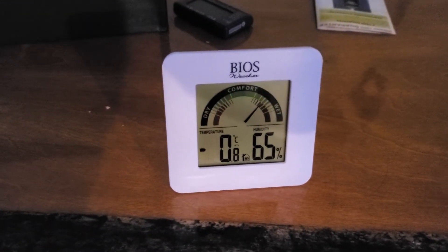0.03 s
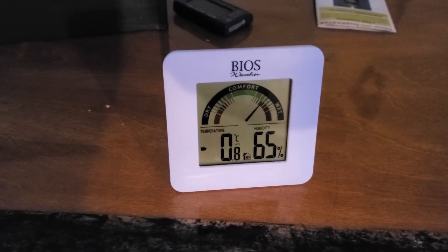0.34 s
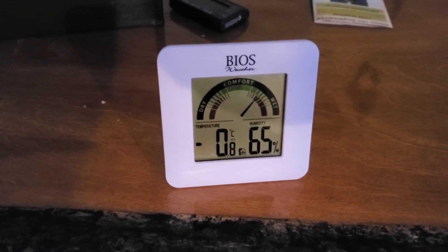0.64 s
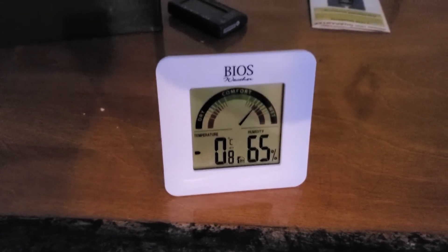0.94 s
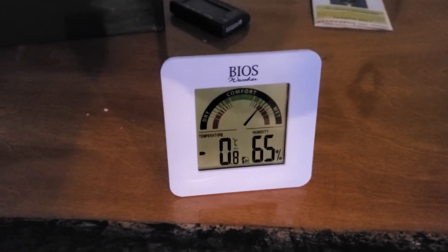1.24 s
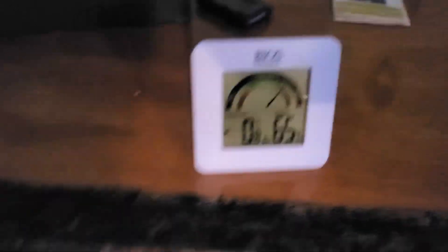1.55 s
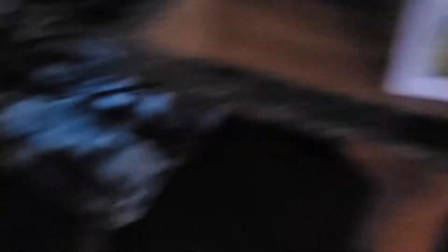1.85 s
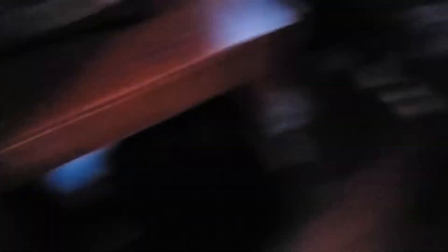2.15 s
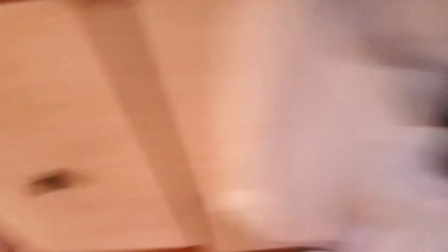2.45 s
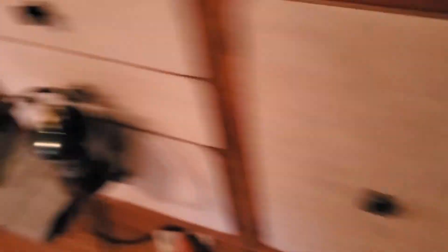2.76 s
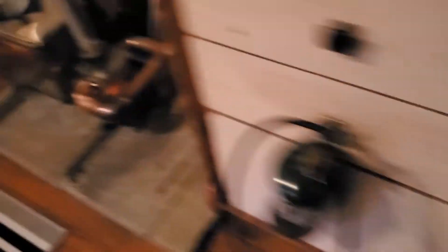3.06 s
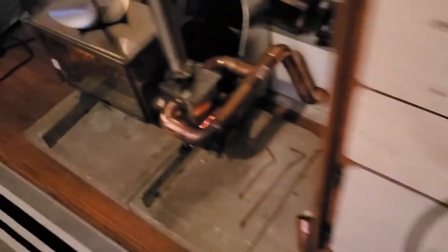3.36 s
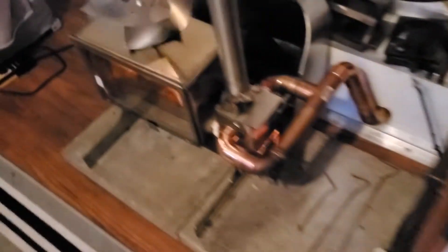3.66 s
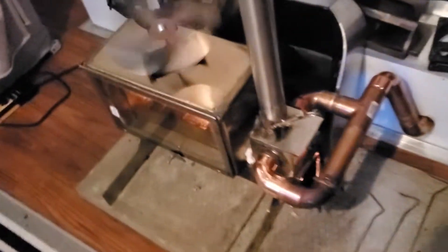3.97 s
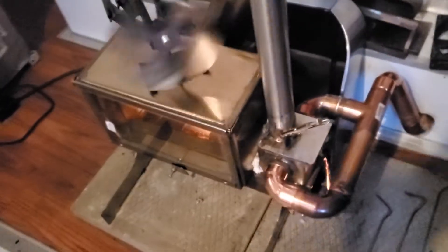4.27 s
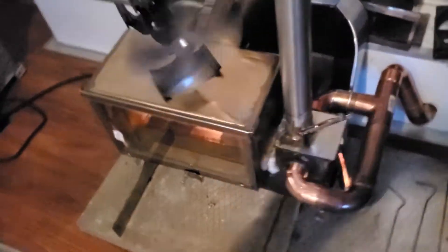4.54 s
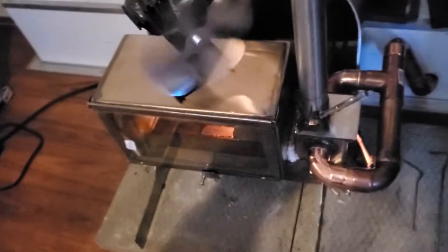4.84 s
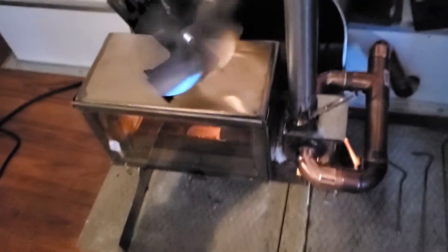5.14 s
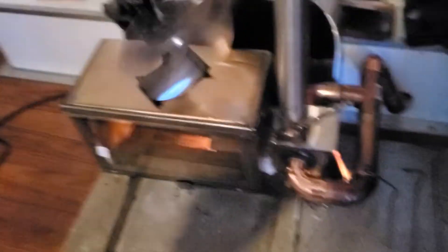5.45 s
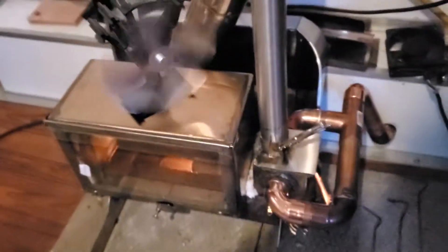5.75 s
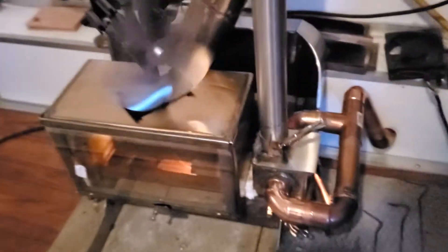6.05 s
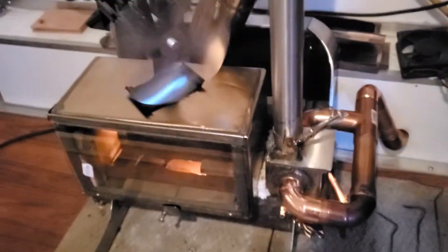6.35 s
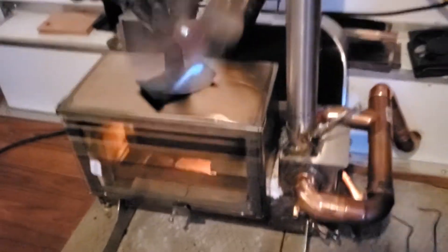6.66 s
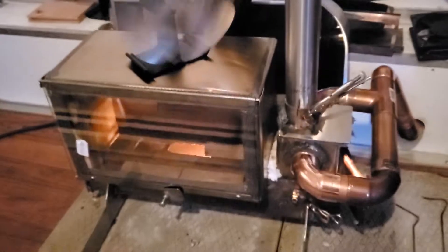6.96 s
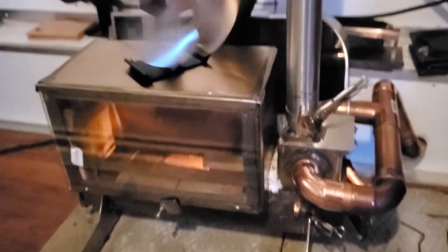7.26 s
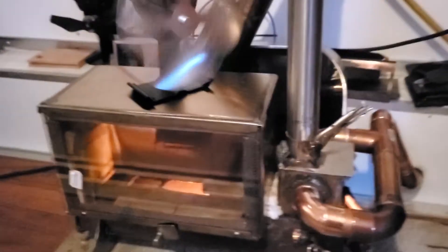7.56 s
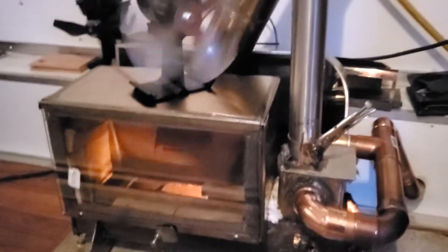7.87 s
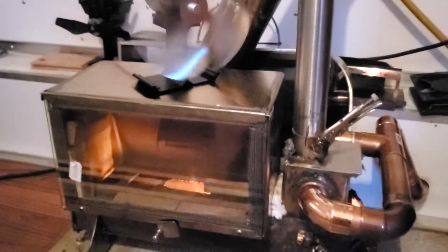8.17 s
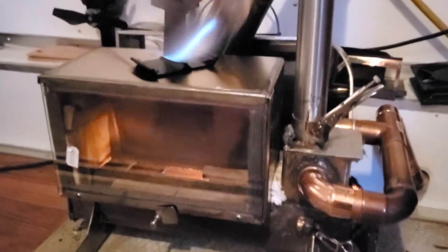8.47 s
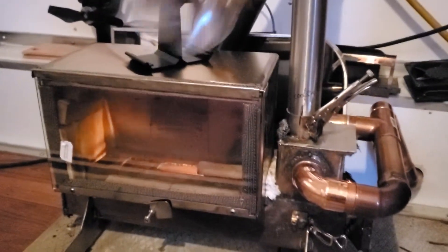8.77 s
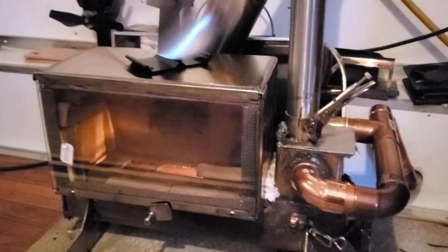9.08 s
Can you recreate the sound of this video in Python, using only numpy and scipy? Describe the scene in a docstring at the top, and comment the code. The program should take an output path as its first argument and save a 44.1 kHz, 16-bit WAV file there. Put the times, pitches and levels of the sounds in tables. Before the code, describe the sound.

A small stove's flame rumbles softly while a nylon jacket rustles, with a gust on the microphone and a few footstep thuds.

```python
"""In a small cabin, someone in a nylon jacket turns round and steps up to a little stove, phone in hand.
The flame flutters, rumbles and rings the hollow of the stove. Steps thud on the floor, and the quick
turn drives air across the phone's two microphone openings. The jacket hisses as it slides,
and its folds crumple, rasp and snap."""
import sys
import numpy as np
from scipy.fft import rfft, irfft, next_fast_len
from scipy.io import wavfile
from scipy.ndimage import uniform_filter1d

SR = 44100
rng = np.random.default_rng(int(sys.argv[2]) if len(sys.argv) > 2 else 0)


def unload_audio(sound):
    """Save the sound as a 16-bit wav file, at the path given as the first command line argument."""
    columns = np.transpose(np.atleast_2d(sound))
    # keep every value between -1 and 1, then stretch to whole-number steps
    steps = np.round(np.clip(columns, -1, 1) * 32767)
    wavfile.write(sys.argv[1], SR, steps.astype(np.int16))


N = 406161
T = np.arange(N) / SR
FFT_SIZE = next_fast_len(N, True)
FREQ = np.fft.rfftfreq(FFT_SIZE, 1 / SR) + 1e-3
SIDES = np.array([[1], [-1]])  # left, right
TOP_HZ = 15800  # the phone cuts the treble above this


def undb(db):
    """Turn decibels into a gain."""
    return 10 ** (np.asarray(db) / 20)


def unit(x):
    """Scale to an average strength (rms) of 1."""
    return x / np.sqrt(np.mean(x ** 2))


def curves(table):
    """Join a table's rows with straight lines in time, one curve for each column of values."""
    time_s, *columns = np.transpose(table)
    return [np.interp(T, time_s, column) for column in columns]


def contour(points):
    """Spread (pitch_hz, level_db) points over all frequencies."""
    pitch_hz, level_db = np.transpose(points)
    return np.interp(np.log(FREQ), np.log(pitch_hz), level_db)


def shape(x, gain):
    """Filter x with one gain for each frequency."""
    return irfft(rfft(x, FFT_SIZE) * gain, FFT_SIZE)[..., :N]


def colour(x, points):
    """Give x the tone of a table, falling away beyond its ends; strength 1."""
    low_cut = 1 + (.7 * points[0][0] / FREQ) ** 6
    high_cut = 1 + (FREQ / points[-1][0] / 1.4) ** 6
    return unit(shape(x, undb(contour(points)) / np.sqrt(low_cut * high_cut)))


def resonance(pitch_hz, width_hz):
    """Filter gains that peak at one pitch and drop steeply on both sides."""
    return 1 / (1 + ((FREQ ** 2 - pitch_hz ** 2) / (FREQ * width_hz * 1.5)) ** 2)


def smooth(x, samples):
    """Take a running average twice."""
    return uniform_filter1d(uniform_filter1d(x, samples), samples)


def wander(rate_hz):
    """A smooth random wobble with rate_hz new values a second; strength 1."""
    hold = max(int(SR / rate_hz), 1)
    levels = np.repeat(rng.standard_normal(N // hold + 1), hold)
    return unit(smooth(levels, hold)[:N])


def stereo_noise(side_db):
    """Noise for left and right; the lower side_db, the more alike they are."""
    return unit(rng.standard_normal(N) + undb(side_db) * SIDES * rng.standard_normal(N))


def steady(x, seconds):
    """Level out any swells slower than the given time."""
    power = np.mean(x ** 2, axis=0)
    return x / np.sqrt(smooth(power, int(seconds * SR)) + 1e-9)


def swell(middle_s, half_length_s):
    """A smooth rise and fall that peaks at 1."""
    return np.exp(-.5 * np.minimum(((T - middle_s) / half_length_s) ** 2, 80))


def fade(start_s, fade_s, rise_s):
    """The loudness of a blow: a quick rise, and a fall of 60 dB in fade_s."""
    age = np.maximum(T - start_s, 0)
    return (1 - np.exp(-age / rise_s)) * np.exp(-np.minimum(np.log(1000) * age / fade_s, 40))


# tone of the background hiss: pitch_hz, level_db
HISS_TONE = [(350, -4), (500, -3.5), (700, -6), (1100, -9.5), (2300, -11), (3000, -11.5), (5500, -16.5),
             (7400, -11.5), (8200, -20), (10000, -17.5), (12000, -14), (15500, -10)]


def room_hiss():
    """The quiet room and the microphone hiss faintly."""
    return undb(-79 + SIDES * 0.11) * colour(stereo_noise(side_db=0.5), HISS_TONE)


# tone of the hand's rumble: pitch_hz, level_db
HAND_TONE = [(28, -15), (40, -3), (52, -6), (80, -11.5), (160, -23)]
# its loudness: time_s, level_db
HAND_LEVELS = [(0, -66.5), (1.2, -71.5), (2.5, -50), (3.3, -69), (4, -76), (9.2, -77)]


def hand_rumble():
    """The hand trembles on the phone's case, mostly near the left opening."""
    level_db, = curves(HAND_LEVELS)
    return colour(stereo_noise(side_db=-10), HAND_TONE) * undb(level_db + SIDES * 4.2)


def ringing_air(notes):
    """Swirling air rings a hollow at its own notes; strength about 1."""
    gain = sum(undb(level_db) * resonance(pitch_hz, width_hz) for pitch_hz, width_hz, level_db in notes)
    return steady(shape(stereo_noise(side_db=-14.5), gain), seconds=0.31)


# the fire as heard on the way to the stove: time_s, rumble_db, note_db
FIRE_LEVELS = [(0, -65.5, -95), (1.35, -65.5, -85.5), (1.8, -52.5, -68.5), (2.7, -51, -70),
               (2.9, -52.5, -62), (4.3, -50.5, -60.5), (5.25, -51, -62), (5.65, -54, -79),
               (6.05, -56.5, -78), (7.1, -52, -68.5), (7.45, -53.5, -74.5), (8.4, -52.5, -66.5),
               (9.2, -54, -76)]
# brief flares and dips of the flame: middle_s, rumble_change_db, note_change_db
FIRE_FLARES = [(.72, -3, 2), (1.03, -9, -3), (1.4, 10, 0), (2.92, 5, 2), (3.45, 1, 6), (3.76, 10, 0),
               (4.03, 4, 2.5), (4.25, 6.5, 2), (4.8, -1, -6), (5.27, 7, -0.5), (5.72, -7.5, -7),
               (5.901, 5.5, 6), (7.65, -0.5, 7.5), (8.33, 2, 2), (8.63, -7.5, -3), (8.78, 2, 8)]
# how hard the fire draws air: time_s, rush_share (0 to 1)
FIRE_DRAW = [(0, 0.56), (2.5, 0.96), (2.9, 1), (5.25, 0.88), (5.6, 0), (7, 0.13), (9.2, 0)]
# tone of the flame's rumble: pitch_hz, level_db
RUMBLE_TONE = [(20, -24.5), (35, -19), (55, -3), (78, 4.5), (100, -6.5), (120, -5.5), (150, -13),
               (195, -15.5), (235, -23), (300, -30.5)]
# narrow notes of the air in the stove and its pipe: pitch_hz, width_hz, level_db
CALM_NOTES = [(263.8, 6.6, 8), (353.4, 17, 0), (438, 17, 1), (499, 19, -0.5), (527, 24, -35)]
# the broader rush when the fire draws hard: pitch_hz, width_hz, level_db
RUSH_NOTES = [(147.3, 19, 7.5), (198.3, 11.3, 4), (418.5, 30, -1), (481, 34, -2.5), (545, 22, -6),
              (653, 64, -14.5), (797, 39, -13.5)]


def stove():
    """The flame flutters and flares; its swirling air rumbles and rings the hollow of the stove."""
    rumble_db, note_db = curves(FIRE_LEVELS)
    for middle_s, rumble_change_db, note_change_db in FIRE_FLARES:
        flare = swell(middle_s, half_length_s=0.043)
        rumble_db += rumble_change_db * flare
        note_db += note_change_db * flare
    rush_share, = curves(FIRE_DRAW)
    flutter_db = 2.03 * wander(30) + 0.31 * wander(6.6)
    rumble = steady(colour(stereo_noise(side_db=-17), RUMBLE_TONE), seconds=0.16)
    calm = undb(-2.5) * np.sqrt(1 - rush_share) * ringing_air(CALM_NOTES)
    rush = undb(3) * np.sqrt(rush_share) * ringing_air(RUSH_NOTES)
    return (rumble * undb(rumble_db - 1.1) + (calm + rush) * undb(note_db)) * undb(flutter_db)


# steps and bumps on the floor: start_s, level_db, pitch_hz, fade_s, upper_note_db
FOOTSTEPS = [(4.388, -40, 69.3, 0.97, -7), (4.969, -44, 98, 0.21, 0), (6.126, -34, 100.6, 0.35, -6.5),
             (6.18, -38.5, 80, 0.71, -11.5), (6.621, -39, 64.5, 0.18, -16), (6.648, -42.5, 53.8, 1, -29)]


def footsteps():
    """Each step rings two dying notes in the floor and shakes the room a little."""
    shudder_tone = [(40, -2), (90, -1.5), (180, -21), (320, -19.5), (600, -27)]  # pitch_hz, level_db
    shudder = undb(-11.5) * colour(stereo_noise(side_db=-6), shudder_tone)
    out = 0
    for start_s, level_db, pitch_hz, fade_s, upper_note_db in FOOTSTEPS:
        phase = 2 * np.pi * pitch_hz * (T - start_s)
        boards = np.sin(phase) + undb(upper_note_db) * np.sin(1.8 * phase)
        out += undb(level_db) * fade(start_s, fade_s, rise_s=0.0016) * (boards + shudder)
    return out


# tone of air hitting the microphone openings: pitch_hz, level_db
WIND_TONE = [(20, -30), (40, -0.5), (65, 6.5), (100, -1.5), (140, -9.5), (220, -21), (330, -35.5),
             (700, -48.5)]
# gusts during the turn: middle_s, half_length_s, left_db, right_db
WIND_GUSTS = [(1.967, 0.0091, -25, -58), (2.06, 0.021, -24.5, -43), (2.144, 0.019, -23, -50),
              (2.223, 0.0085, -23, -49), (2.335, 0.057, -23.5, -49), (2.441, 0.017, -25.5, -48),
              (2.514, 0.013, -28, -60), (2.585, 0.018, -26, -56), (2.654, 0.02, -31.5, -46),
              (2.727, 0.021, -35.5, -48), (2.879, .012, -32, -54), (2.958, 0.023, -34, -37),
              (3.05, .022, -69, -38), (3.152, 0.022, -47, -38)]


def wind_on_phone():
    """Air streams over the swinging phone and breaks into short gusts, first left, then right."""
    stream = undb(-42.5 + SIDES * 8.5) * swell(middle_s=2.24, half_length_s=0.14)
    power = stream ** 2
    for middle_s, half_length_s, left_db, right_db in WIND_GUSTS:
        power += (undb([[left_db], [right_db]]) * swell(middle_s, half_length_s)) ** 2
    swirls = [steady(colour(rng.standard_normal((1, N)), WIND_TONE), seconds=0.028) for _ in SIDES]
    return np.vstack(swirls) * np.sqrt(power)


# snapping folds, and one soft pop as the flame flares: start_s, crack_db, tail_db, pitch_hz, fade_s
SNAPS_AND_POP = [(1.345, -69, -74, 1400, .15), (2.011, -39, -52, 1900, 0.027),
                 (2.041, -36, -44.5, 426, 0.092), (2.054, -38.5, -45, 1200, 0.11),
                 (3.026, -52, -53.5, 1700, 0.2), (3.844, -52, -50.5, 750, .1), (4.248, -56, -61, 600, 0.14),
                 (4.43, -42.5, -49.5, 1380, 0.12), (4.474, -43, -51.5, 1400, 0.14),
                 (4.970, -56, -59, 590, 0.23), (5.304, -60, -62, 1100, 0.32), (6.130, -40, -52, 1180, 0.22),
                 (6.691, -47, -59, 1100, .04), (6.975, -48, -49, 1820, 0.046),
                 (7.778, -46.5, -58, 1650, .035)]


def snaps():
    """A fold flips or the flame pops: a crack of a wave or two that the cabin draws out."""
    out, noise = 0, stereo_noise(side_db=-2.5)
    for start_s, crack_db, tail_db, pitch_hz, fade_s in SNAPS_AND_POP:
        cycles = np.maximum(T - start_s, 0) * pitch_hz
        envelope = np.minimum(cycles / .5, 1) * np.exp(-np.minimum(cycles / 0.63, 40))
        crack = np.sin(2 * np.pi * cycles) * envelope
        tail = unit(shape(noise, resonance(pitch_hz, 0.55 * pitch_hz)))
        tail *= fade(start_s, fade_s, rise_s=0.0018)
        out += undb(crack_db) * crack / np.abs(crack).max() + undb(tail_db) * tail
    return out


# the weave zips or a fold rasps: middle_s, half_length_s, pitch_hz, width_hz, level_db
CLOTH_RASPS = [(.75, 0.092, 6500, 900, -90), (1.55, 0.041, 1730, 453, -76), (4.47, 0.033, 1490, 1100, -61),
               (4.797, 0.023, 1460, 594, -62.5), (5.961, 0.015, 3330, 1260, -64),
               (6.579, 0.01, 5530, 3020, -57), (6.604, 0.029, 1700, 1070, -54),
               (6.876, 0.042, 1540, 1410, -54.5), (7.992, 0.021, 5560, 260, -56)]


def rasps():
    """Ribs of the weave catch on each other; each stroke zips at its own pitch."""
    out, catches = 0, stereo_noise(side_db=-1) * undb(0.76 * wander(350))
    for middle_s, half_length_s, pitch_hz, width_hz, level_db in CLOTH_RASPS:
        rasp = unit(shape(catches, resonance(pitch_hz, width_hz)))
        out += undb(level_db) * swell(middle_s, half_length_s) * rasp
    return out


def cloth_patches(x, wobble_db, rate_hz, bands=18):
    """Different patches of cloth touch in turn, so each band of pitches swells a little on its own."""
    centres = np.log(np.geomspace(500, TOP_HZ, bands))
    out = 0
    for band in np.eye(bands):
        band_gain = np.interp(np.log(FREQ), centres, band)
        out += shape(x, band_gain) * undb(wobble_db * wander(rate_hz))
    return out


# how briskly the body moves in the jacket: time_s, hiss_db
BODY_MOVEMENT = [(1.15, -79), (1.42, -76.5), (1.62, -62.5), (1.82, -58.5), (2.3, -56.5), (2.48, -61.5),
                 (2.72, -63), (2.9, -68), (3.35, -62), (3.95, -64.5), (4.25, -73), (4.6, -69), (5.7, -71.5),
                 (6.35, -69), (7.15, -59), (7.42, -69), (7.74, -66.5), (8.25, -60.5), (8.8, -78),
                 (9.2, -80)]
# how posture colours the cloth: time_s, crumple_db, left_minus_right_db, brightness_db
BODY_POSTURE = [(1.3, -5, 5, -11), (1.7, -5, 2, -0.5), (2.9, -1, 3.7, 0), (3.8, -0.5, 1.5, 3),
                (4.25, -0.5, 5, -3), (5.1, -3, 4, -3.5), (6.0, -1, 2.5, 1), (7.1, -3, 0, 3),
                (7.45, -5.5, 1, -1.5), (8.25, -4, -2.5, 3.5), (9.2, -6, 1.5, -13)]
# sleeve swishes: middle_s, half_length_s, hiss_db, crumple_db, treble_db, left_minus_right_db
# (crumple_db and treble_db are relative to the hiss)
SLEEVE_SWISHES = [(2.04, 0.037, -55.5, -1, -7, 4), (2.303, 0.066, -62.5, -4, 2, 3),
                  (3.087, 0.08, -61.5, -4, -9, 1), (3.71, .04, -64.5, 2.5, -12, 2),
                  (4.073, 0.015, -67.5, 1, 0, 5), (4.415, 0.032, -59.5, -9, -12, 1),
                  (4.764, 0.041, -70, -14, -13, 4), (5.32, 0.038, -65, -2.5, -9, 5),
                  (5.506, 0.04, -65.5, -10, -8, 2), (5.773, 0.065, -68.5, 2.5, -7, 2),
                  (5.962, 0.023, -70, -1, -5, -12), (6.062, 0.025, -68.5, 0, -13, -8),
                  (6.2, 0.045, -57.5, -4.5, -3.5, -4), (6.48, 0.047, -62.5, -4, -9, 3.5),
                  (6.587, .014, -64.5, -6, -6, 0), (6.694, 0.054, -67, 2.5, -11, 1),
                  (6.888, 0.039, -59.5, 4, -1, 0), (7.842, 0.05, -60.5, -3.5, -15, -.5),
                  (7.972, 0.086, -56.5, -3.5, -6.5, -2.5), (8.316, 0.038, -66, 0.5, 2, -4)]


def rubbing():
    """Body and sleeves rub the cloth: gains for its hiss, treble and crumpling, and its brightness."""
    move_db, = curves(BODY_MOVEMENT)
    fade_in = np.clip((T - BODY_MOVEMENT[0][0]) / 0.3, 0, 1)
    crumple_db, left_minus_right_db, brightness_db = curves(BODY_POSTURE)
    treble_db = -3 - 0.065 * (move_db + 64)  # brisker movement has a smaller share of treble
    strokes = [(undb(move_db) * fade_in, crumple_db, treble_db, left_minus_right_db)]
    for middle_s, half_length_s, hiss_db, *tone in SLEEVE_SWISHES:
        strokes.append((undb(hiss_db) * swell(middle_s, half_length_s), *tone))
    hiss = treble = crumple = 0
    for strength, crumple_db, treble_db, left_minus_right_db in strokes:
        power = (strength * undb(SIDES * (left_minus_right_db + 0.45) / 2)) ** 2
        hiss += power
        treble += power * undb(treble_db) ** 2
        # crumpling is what the middle pitches hold beyond the sliding hiss
        crumple += strength ** 2 * np.maximum(undb(crumple_db) ** 2 - undb(-6.5) ** 2, undb(-22.5) ** 2)
    return np.sqrt(hiss), np.sqrt(treble), np.sqrt(crumple), brightness_db


# tone of sliding nylon: pitch_hz, level_db
SLIDE_TONE = [(1000, -17.5), (1500, -3), (2300, -3), (2800, -5), (4000, -3), (5600, -4), (7400, -3),
              (8200, -12), (10000, -12), (11500, -9), (14000, -9.5), (15500, -6)]
# tone of crumpling folds: pitch_hz, level_db
CRUMPLE_TONE = [(200, 3), (450, 1), (800, 0), (1300, 1.5), (1900, 1), (2400, -2.5), (2750, -25.5),
                (5000, -9.5)]


def jacket():
    """Nylon slides in countless tiny slips, while its folds crumple lower down in coarser grains."""
    hiss_gain, treble_gain, crumple_gain, brightness_db = rubbing()
    slips = undb(0.37 * wander(500) + .5 * wander(50))
    slide = colour(stereo_noise(side_db=0.5) * slips, SLIDE_TONE)
    slide += (undb(brightness_db) - 1) * shape(slide, resonance(pitch_hz=2750, width_hz=700))
    treble = shape(slide, 1 / (1 + (9000 / FREQ) ** 8))
    grains = stereo_noise(side_db=-3.5) * undb(1.15 * wander(300) + 0.92 * wander(45))
    cloth = undb(3) * hiss_gain * (slide - treble) + undb(11.5) * treble_gain * treble
    cloth += undb(4) * crumple_gain * colour(grains, CRUMPLE_TONE)
    cloth = cloth_patches(cloth, wobble_db=1.5, rate_hz=11)
    return cloth * undb(-0.12 * wander(14))  # cloth never slides quite evenly


def scene():
    """Add up all the sounds that reach the phone."""
    return (room_hiss() + stove() + jacket() + rasps() + wind_on_phone()
            + hand_rumble() + footsteps() + snaps())


# the left opening is a little brighter than the right: pitch_hz, left_minus_right_db
MIC_BALANCE = [(100, 0.2), (400, 2), (1300, 0.3), (2400, 3), (4400, -0.5), (8000, 1), (15000, 1)]


def record(dry):
    """Each microphone opening has its own tone, and the phone cuts the highest treble."""
    low_pass = 1 / np.sqrt(1 + np.minimum(FREQ / TOP_HZ, 1.05) ** 900)
    return shape(dry, undb(SIDES * contour(MIC_BALANCE) / 2) * low_pass)


dry = scene()
out = record(dry)
unload_audio(out)
```